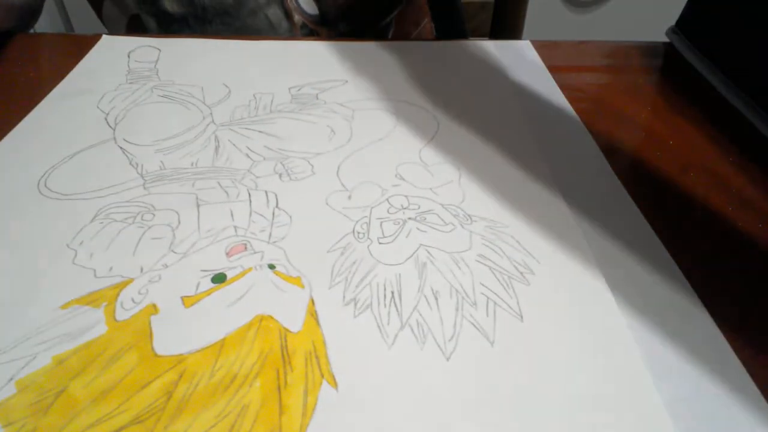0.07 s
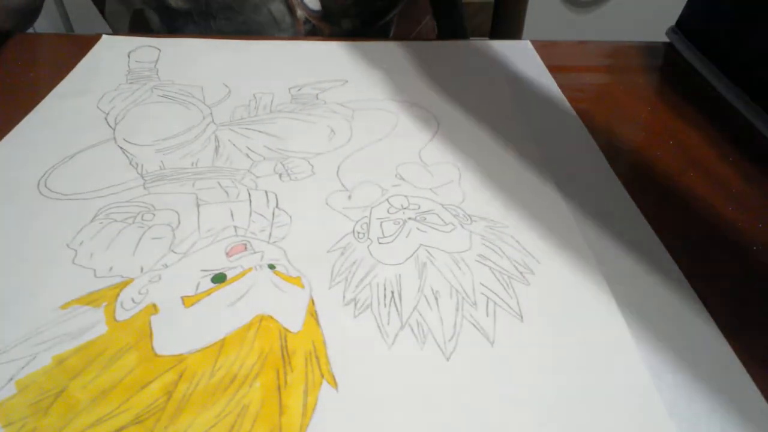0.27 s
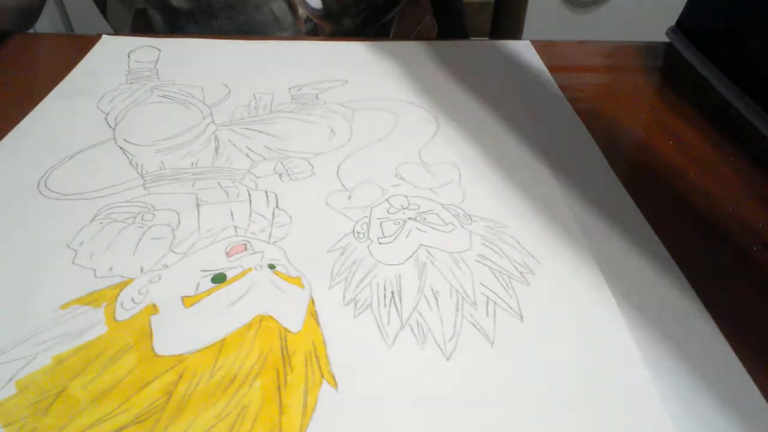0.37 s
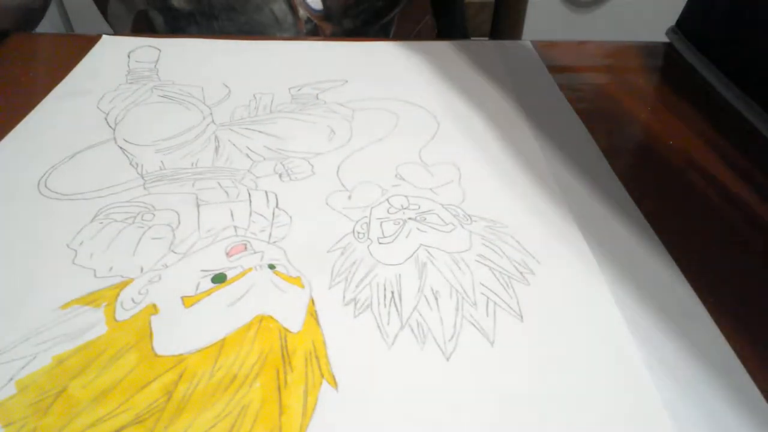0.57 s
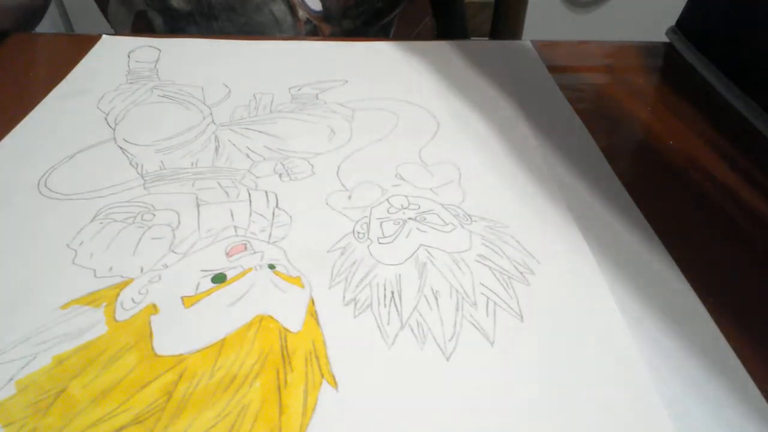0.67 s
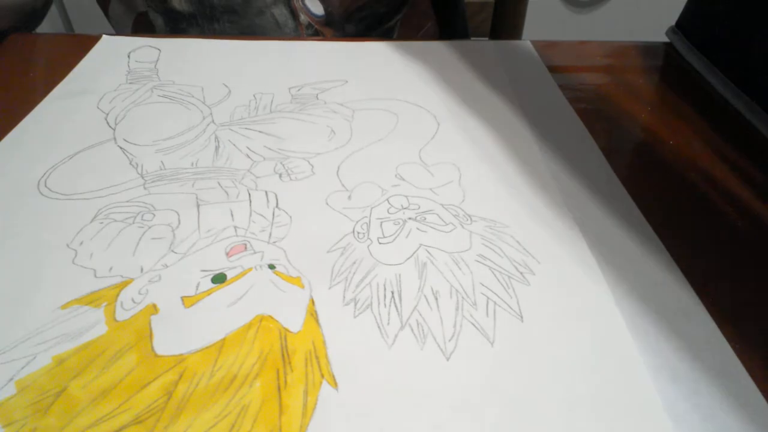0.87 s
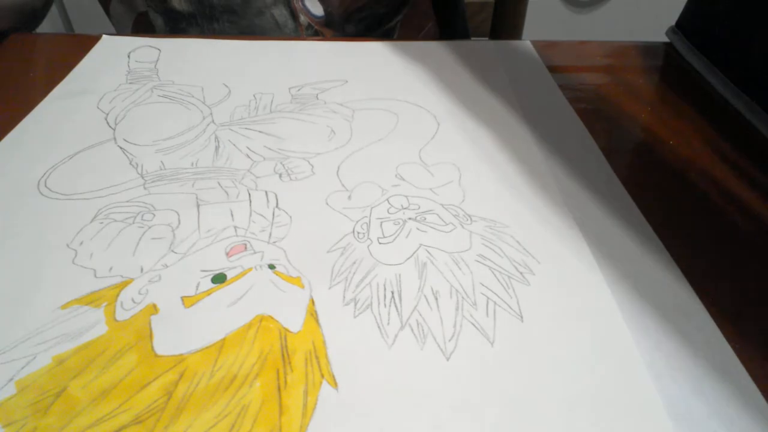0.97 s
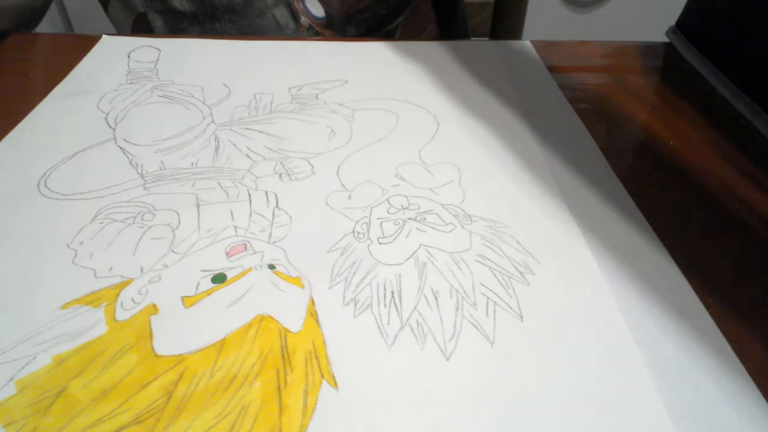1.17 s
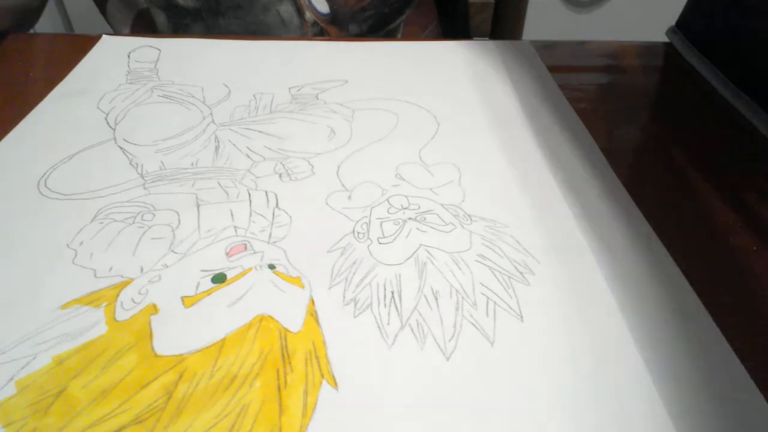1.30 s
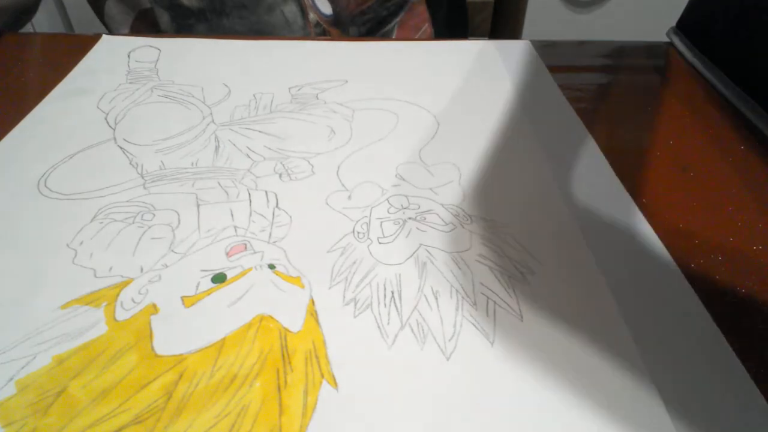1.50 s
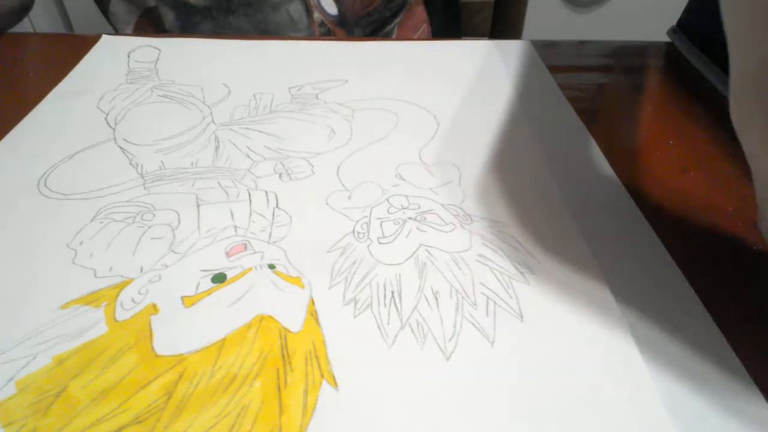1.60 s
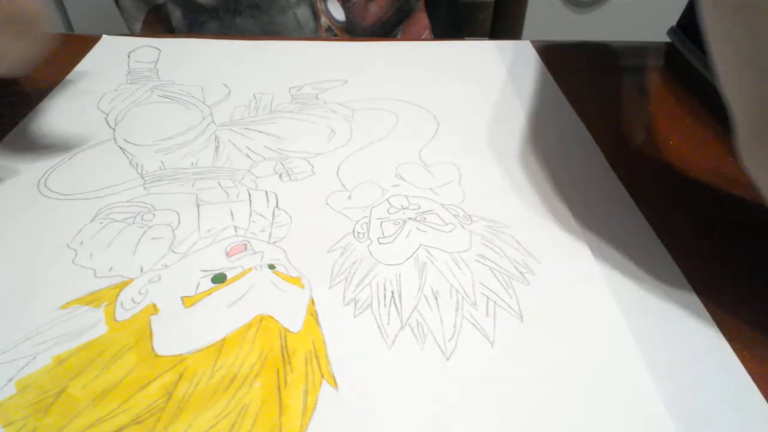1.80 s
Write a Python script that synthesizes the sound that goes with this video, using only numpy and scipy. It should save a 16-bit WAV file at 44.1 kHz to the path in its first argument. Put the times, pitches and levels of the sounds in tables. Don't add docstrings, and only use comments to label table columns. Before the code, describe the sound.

A large paper sheet shifts on a wooden table, close and dry in a small room. A faint brush at 0 s, a nudge at 0.2, then stronger grainy shoves from 0.33 to 0.8 with hollow pops and clicks. Thin crisp ticks fade by 1.1. After near silence with faint low hum, a sharp pop at 1.39 starts a smooth hissing slide, hitching at 1.52, fading by 1.75; a last small tick at 1.82.

```python
import sys
import numpy as np
from scipy import signal
from scipy.fft import rfft, irfft
from scipy.io import wavfile
from scipy.ndimage import uniform_filter1d

SR = 44100
rng = np.random.default_rng(int(sys.argv[2]) if len(sys.argv) > 2 else 0)


def dump(signal):
    limited = np.clip(np.atleast_2d(signal).T, -1, 1)
    pcm = np.round(limited * 32767).astype(np.int16)
    wavfile.write(sys.argv[1], SR, pcm)


def boost_factor(decibels):
    exponent = np.asarray(decibels, float) / 20
    return 10 ** exponent


N = 81585
STFT = dict(nperseg=256, noverlap=192)


def evened(x):
    return x / np.sqrt(np.mean(x ** 2) + 1e-20)


def read(points, hz):
    f, value = np.transpose(points)
    return np.interp(np.log(hz + 1), np.log(f + 1), value)


def colour(x, points):
    gain = boost_factor(read(points, np.fft.rfftfreq(len(x), 1 / SR)))
    return irfft(rfft(x) * gain, len(x))


def add(mix, start_s, sound):
    part = mix[max(round(start_s * SR), 0):][:len(sound)]
    part += sound[:len(part)]


def smooth(grid, bins, frames):
    return uniform_filter1d(uniform_filter1d(grid, size=bins, axis=0), size=frames, axis=1)


def ring(x, hz, width_hz):
    r = np.exp(-np.pi * width_hz / SR)
    return 2 * signal.lfilter([1 - r], [1, -r * np.exp(2j * np.pi * hz / SR)], x).real


def ring_twice(x, hz, width_hz):
    return ring(ring(x, hz, width_hz), hz, 2 * width_hz)


# pitch_hz, level_db (per Hz)
FLOOR_SPECTRUM = [(71, -57.5), (120, -31.5), (158, -1.5), (240, -11.5), (305, -10.5), (357, -18.5),
                  (396, -12), (522, -22), (7500, -29), (9750, -65), (16500, -120)]


def room_floor():
    return boost_factor(-66) * evened(colour(rng.standard_normal(N), FLOOR_SPECTRUM))


def drag(strokes, spectrum, grain, patch_db):
    dull_hz, treble_hz, treble_knee_db, treble_slope = 970, 4000, -39.5, 0.46
    grains_per_s, grain_db = 5600, 2.5
    t = np.arange(N) / SR
    grains = boost_factor(grain_db * np.minimum(rng.exponential(1, N), 4)) * (rng.random(N) < grains_per_s / SR)
    z = signal.stft(rng.standard_normal(N) * (1 + grain * grains), **STFT)[2]
    patches = evened(smooth(rng.standard_normal(z.shape), 5, 9))
    depth_db = patch_db * np.linspace(0.5, 3, len(z))[:, None]
    hiss = signal.istft(z * boost_factor(depth_db * patches), **STFT)[1][:N]
    hiss = evened(colour(hiss, spectrum))
    low = signal.lfilter(*signal.butter(2, dull_hz, fs=SR), hiss)
    top = hiss - signal.lfilter(*signal.butter(1, treble_hz, fs=SR), hiss)
    out = np.zeros(N)
    for start_s, pressure_db, dullness_db in map(np.transpose, strokes):
        press_db = np.interp(t, start_s, pressure_db, -200, -200)
        lost = 1 - boost_factor(treble_slope * np.minimum(press_db - treble_knee_db, 0))
        dulled_low = low * boost_factor(np.interp(t, start_s, dullness_db))
        out += boost_factor(press_db) * (hiss - lost * top - low + dulled_low)
    return out


# start_s, pressure_db, dullness_db
SHOVES = [
    [(0, -42.5, 13.5), (.03, -58.5, -8), (.11, -87.5, 28), (.13, -97, -13)],
    [(.215, -51.5, 12), (.23, -43, 7.5), (.265, -53, 13.5), (.29, -70, -22.5)],
    [(.328, -50.5, -3), (.35, -28, 5.5), (.4, -34.5, 7.5), (.43, -45.5, -5), (.46, -60.5, -12),
     (.48, -45.5, 5), (.5, -82, -0.5), (.53, -69, 16), (.55, -70, -20)],
    [(.575, -40.5, 2), (.59, -30.5, 15.5), (.645, -35.5, 13), (.655, -33.5, 12), (.685, -31, 2.5),
     (.72, -45.5, -27), (.75, -57.5, 0), (.78, -31.5, -17), (.82, -74, -1)],
    [(.83, -33, -9), (.87, -58.5, -28), (.92, -54, -12), (.935, -56, -28), (.955, -85, -21.5),
     (.98, -77, 10), (1.015, -55.5, -5), (1.03, -82.5, 2)],
]
# pitch_hz, level_db (per Hz)
RUSTLE_SPECTRUM = [(71, -47), (120, -9.5), (878, -4.5), (991, -0.5), (1310, 1.5), (2000, -2.5), (2750, -7),
                   (6530, -22), (7500, -23), (9750, -52.5), (16500, -120)]


def shoves():
    return drag(SHOVES, RUSTLE_SPECTRUM, grain=2.1, patch_db=6.0)


def click(peak_db, pitch_hz, t60_s):
    t = np.arange(4410) / SR
    rise = 1 - np.exp(-t * pitch_hz / 0.22)
    swing = np.sin(2 * np.pi * pitch_hz * t) * rise * boost_factor(-60 * t / t60_s)
    return boost_factor(peak_db) * swing / abs(swing).max()


# start_s, peak_db, pitch_hz, t60_s
CLICKS = [(.0005, -34, 285, 0.021), (.025, -42.5, 2775, 0.034), (.0395, -38, 2990, 0.027),
          (.040, -49, 6660, 0.025), (.042, -30.5, 1250, 0.022), (.085, -50.5, 1120, 0.071),
          (.086, -57, 2700, .03), (.329, -28.5, 2757, 0.039), (.331, -23.5, 282, 0.027),
          (.3440, -13.5, 1904, 0.011), (.3442, -10, 2510, 0.019), (.3441, -11.5, 3310, 0.0092),
          (.3455, -15, 1672, .023), (.348, -18, 695.5, 0.016), (.5805, -15.5, 4060, 0.021),
          (.5815, -9.5, 1250, .02), (.5822, -5, 539.4, 0.0487), (.9305, -26.5, 6100, .01),
          (.9306, -23.5, 7700, 0.012), (.930, -31, 1240, 0.019), (.9408, -27, 4000, 0.007),
          (.9452, -33.5, 7370, 0.0083), (.9453, -38, 2700, 0.011), (.963, -50, 2700, .01),
          (.971, -31.5, 2860, .012), (.9872, -33, 3300, .008), (.9922, -32.5, 4000, 0.0049),
          (.999, -47.5, 800, 0.023), (1.0125, -45.5, 745, 0.019), (1.012, -44, 5640, .008),
          (.2158, -17, 2955, 0.016), (.2159, -20.5, 5730, 0.0044), (.2185, -21, 560, 0.027),
          (.2442, -27, 2700, 0.011), (.2443, -28, 4350, .008), (.470, -28, 2758, 0.029),
          (.465, -34, 549, 0.027), (.516, -37, 593, 0.017), (.6598, -17, 4300, 0.0066),
          (.7595, -18, 550, 0.028), (.7596, -25.5, 6370, 0.0031), (.795, -35, 586, 0.05),
          (.8865, -24, 6520, 0.007), (1.35, -31.5, 3590, 0.0064), (1.351, -41, 1113, .03),
          (1.8235, -29, 3890, 0.0093), (1.8236, -27, 2900, 0.0082), (.583, -18.5, 265, 0.047),
          (1.3903, -6.5, 1638, 0.0055), (1.3905, -10, 2590, 0.0033)]


def slip_clicks(tracks):
    for k, (start_s, *slip) in enumerate(CLICKS):
        add(tracks[k % 3], start_s, click(*slip))


# pitch_ratio (share of crease pitch), width_ratio (share of crease pitch), level_db
CREASE = [(.6, 0.4, -6.5), (1., 0.12, 8.5), (1.4, 0.36, -10)]
# pitch_hz, width_hz, level_db
FIZZ = [(3460, 880, -3.5), (6100, 590, 2.5), (6850, 660, -6), (8760, 910, 0.5)]
# pitch_hz, level_db, t60_s
SHEET = [(166.9, -11.5, 0.25), (262, -2.5, 0.018), (357.8, -15.5, 0.022), (537, 5.5, 0.025),
         (657, -4, 0.048), (788, -8, 0.036), (856, -3.5, 0.079), (1250, -16.5, .04)]


def snap(peak_db, boom_db, bright_db, pitch_hz, length_s):
    t = np.arange(4410) / SR
    length_s = np.clip(length_s, .0003, .02)
    slips = rng.standard_normal(len(t)) * boost_factor(7.1 * rng.standard_normal(len(t)))
    slips = slips * (1 - np.exp(-t / (0.4 * length_s))) * np.exp(-t / length_s)
    bend = 1 + 0.19 * (2 * rng.random(20) - 1)
    crease, fizz, body = np.zeros((3, len(t)))
    for k, (ratio, width, db) in enumerate(CREASE):
        crease += (-1) ** k * boost_factor(db) * ring_twice(slips, ratio * pitch_hz, width * pitch_hz)
    for k, (hz, width_hz, db) in enumerate(FIZZ):
        fizz += (-1) ** k * boost_factor(db) * ring_twice(slips, hz * bend[k], width_hz)
    for k, (hz, db, t60_s) in enumerate(SHEET):
        bent_hz = hz * (1 + 0.035 * (bend[k + 4] - 1))
        body += boost_factor(db) * ring(slips, bent_hz, 1.96 / t60_s) * np.sqrt(t60_s)
    gains = boost_factor([-8.5, 3.5 + bright_db, 12 + boom_db, -22.5])
    return boost_factor(peak_db) * sum(g * p / abs(p).max() for g, p in zip(gains, [crease, fizz, body, slips]))


# start_s, peak_db, boom_db, bright_db, pitch_hz (of the crease)
POPS = [(.001, -42, -1, -31, 1520), (0.04, -23, -38.5, -43, 1300), (0.2154, -11.5, -15, -20.5, 3110),
        (.328, -28, -9.5, 4.5, 2700), (0.3437, -5, -24, -15.5, 2190), (0.4675, -25.5, -17, 1.5, 2750),
        (0.5146, -25.5, -28.5, -10.5, 2390), (0.5801, -13, -5, -24.5, 1250), (0.583, -16, -6.5, -9, 1000),
        (.659, -5.5, -22.5, -26, 1990), (0.68, -21.5, -16, -26.5, 2020), (0.7583, -14, -20, -17, 1165),
        (.794, -23.5, -12, -27, 1107), (1.3872, -14.5, -17, -6.5, 1190), (1.390, -7.5, -21, -32.5, 1840),
        (1.522, -16.5, -8, -13.5, 1306), (1.557, -10.5, -13.5, -14, 1750), (1.689, -37.5, -16, -39.5, 1760),
        (1.732, -41.5, -18.5, -26, 1562), (1.823, -19, -15, -13, 2280)]


def buckling_pops(tracks):
    for k, (start_s, *pop) in enumerate(POPS):
        add(tracks[k % 3], start_s, snap(*pop, length_s=0.0024))


# start_s, peak_db, bright_db, length_s
TICKS = [(0.08, -41.5, -23.5, 0.0092), (0.1594, -43, -18, 0.0046), (0.166, -29, -22.5, 0.0033),
         (0.203, -24, -10.5, 0.0053), (0.2437, -21.5, -5.5, 0.0014), (0.25, -22.5, -11, 0.0019),
         (0.254, -37, -3, 0.0025), (0.312, -37.5, -18, 0.0056), (0.383, -14.5, -9, 0.0038),
         (0.462, -25, -16, 0.0024), (0.556, -44, -4.5, 0.0019), (.565, -32, -3, 0.003),
         (0.7654, -20, -3.5, 0.0021), (0.77, -28, -1, 0.0036), (0.834, -28.5, -1, 0.0028),
         (0.8583, -16, -8.5, 0.002), (0.887, -23, 7, 0.00033), (0.899, -26.5, -0.5, 0.003),
         (0.924, -21, -5, 0.011), (0.942, -32, -2.5, 0.0025), (0.969, -24, -13.5, 0.0019),
         (0.986, -25, -8, 0.0014), (0.999, -44, -10, 0.00076), (1.0118, -38, -1.5, 0.0015),
         (1.067, -46.5, -7, 0.002), (1.075, -35.5, -8, 0.0072), (1.097, -36.5, -5, 0.0044),
         (1.347, -27.5, -13, 0.003), (0.192, -63.5, 5.5, 0.004), (1.711, -39, -35.5, 0.0079)]


def crease_ticks(tracks):
    for k, (start_s, peak_db, bright_db, length_s) in enumerate(TICKS):
        tick = snap(peak_db, -48, bright_db, 2700, length_s)
        add(tracks[(k + 2) % 3], start_s, tick)


# start_s, pressure_db, dullness_db
SLIDE = [
    [(1.378, -55, 7), (1.386, -42.5, -19.5), (1.39, -22.5, 5), (1.43, -23, 3.5), (1.47, -27, 0),
     (1.495, -34, 8), (1.52, -42, -29.5)],
    [(1.52, -40.5, -16), (1.545, -30.5, 1.5), (1.6, -29.5, -19), (1.62, -41, -1), (1.655, -49.5, -26.5),
     (1.685, -63.5, 2), (1.72, -55.5, -8.5), (1.76, -66.5, -2)],
]
# pitch_hz, level_db (per Hz)
SLIDE_SPECTRUM = [(110, -14), (250, -2), (700, 0), (2400, -5), (4500, -10), (7000, -11), (16000, -14)]


def long_slide():
    return drag(SLIDE, SLIDE_SPECTRUM, grain=0.38, patch_db=0.0)


# pitch_hz, t60_s
ROOM = [(200, 1), (700, 0.69), (2000, 0.18), (5000, 0.99), (8000, 0.17)]


def tail():
    gap_s, cut_s, cut_db = 0.0052, 0.051, -14
    t = np.arange(SR // 3) / SR
    hz, u, z = signal.stft(rng.standard_normal(len(t)), SR, nperseg=256)
    decay = boost_factor(-60 * u / read(ROOM, hz)[:, None])
    h = signal.istft(z * decay, SR, nperseg=256)[1][:len(t)]
    h = h * np.clip(t / gap_s, 0, 1) ** 2 * boost_factor(cut_db * (t / cut_s) ** 3)
    return h / np.linalg.norm(h)


def suppress(x, gate_db):
    z = signal.stft(x, **STFT)[2]
    power = smooth(abs(z) ** 2, 5, 5)
    power_db = 10 * np.log10(power.clip(1e-20) * 128)
    gain = boost_factor(1.5 * np.minimum(power_db - gate_db, 0))
    return signal.istft(z * gain, **STFT)[1][:N]


def scene():
    tracks = np.zeros((3, N))
    slip_clicks(tracks)
    buckling_pops(tracks)
    crease_ticks(tracks)
    wet = sum(signal.oaconvolve(x, tail())[:N] for x in tracks)
    room = suppress(boost_factor(-13) * wet, gate_db=-53)
    rub = suppress(shoves() + long_slide(), gate_db=-59)
    return (tracks.sum(0) + room + rub + room_floor())[None]


# pitch_hz, level_db
TREBLE_EDGE = [(4300, -0.5), (4900, -2), (5500, 0.5), (7300, -0.5), (7800, -8.5), (8200, -13.5), (8500, -16),
               (9200, -37), (9500, -52.5), (15500, -57.5), (16000, -91)]


def band_shaping(x):
    x = signal.sosfilt(signal.butter(4, 144.4, "high", fs=SR, output="sos"), x)
    x = signal.lfilter(*signal.iirnotch(8000, 90, SR), x)
    x = colour(x, TREBLE_EDGE)
    treble = signal.lfilter(*signal.butter(2, 4500, "high", fs=SR), x)
    grit = rng.standard_normal(N) * abs(treble) ** 1.5
    return x + boost_factor(-29) * signal.sosfilt(signal.butter(8, 9300, "high", fs=SR, output="sos"), grit)


def low_pass(x):
    return signal.sosfilt(signal.butter(12, 16200, fs=SR, output="sos"), x)


def record(dry):
    mix = band_shaping(dry[0])[None]
    return low_pass(mix)


dry = scene()
out = record(dry)
dump(out)
```